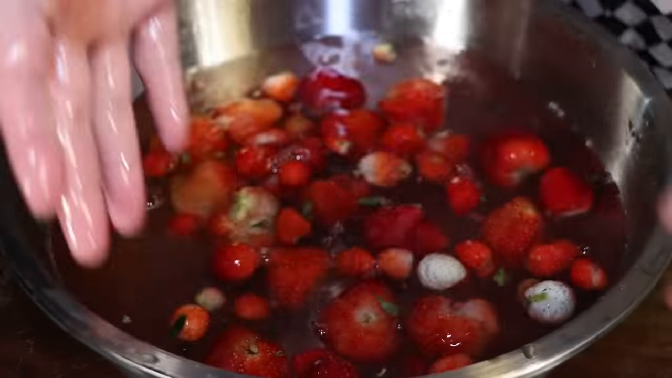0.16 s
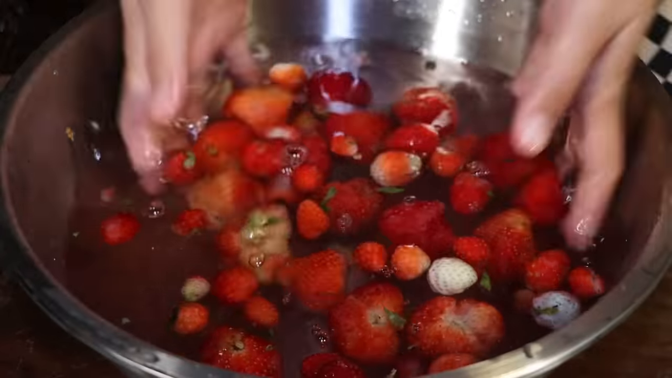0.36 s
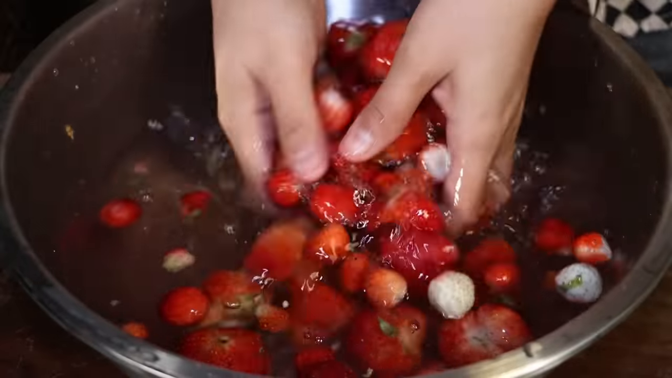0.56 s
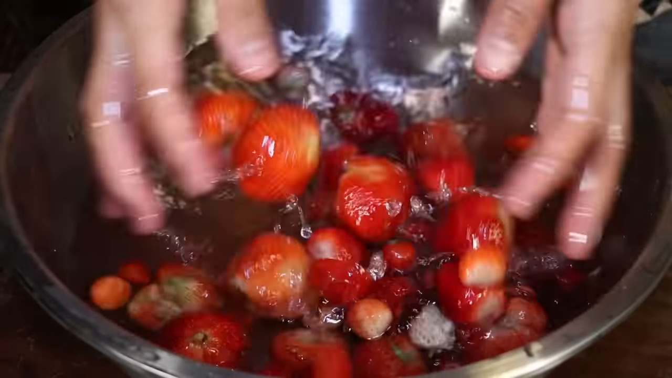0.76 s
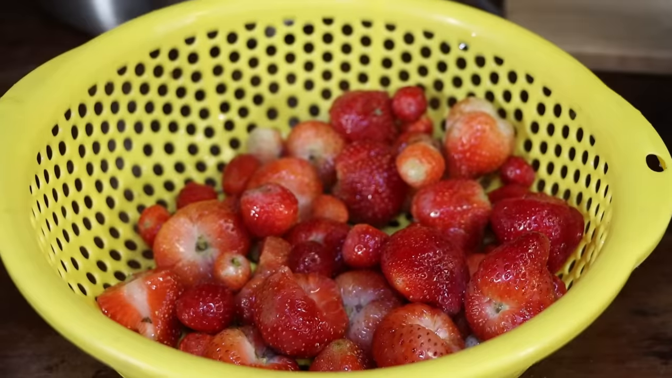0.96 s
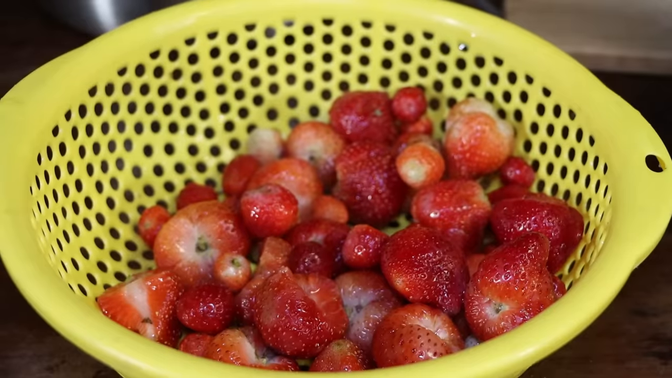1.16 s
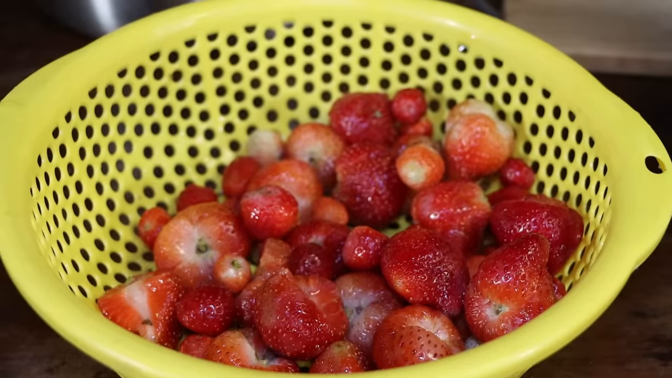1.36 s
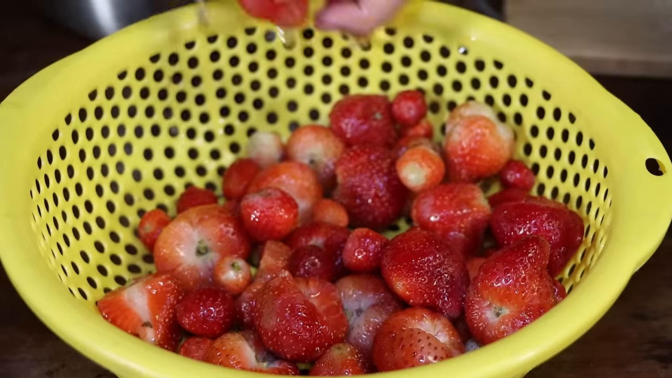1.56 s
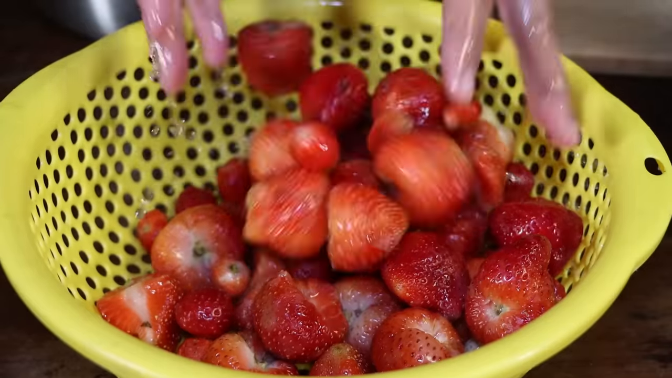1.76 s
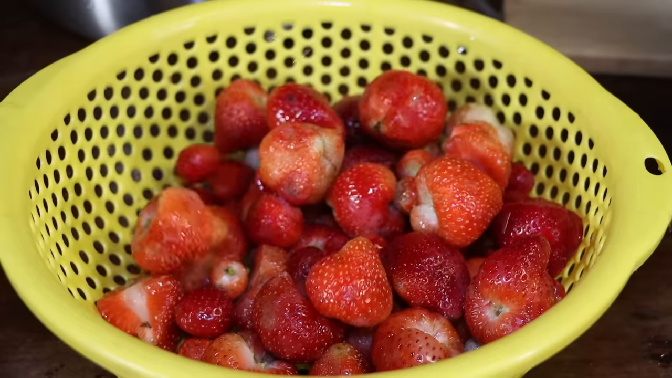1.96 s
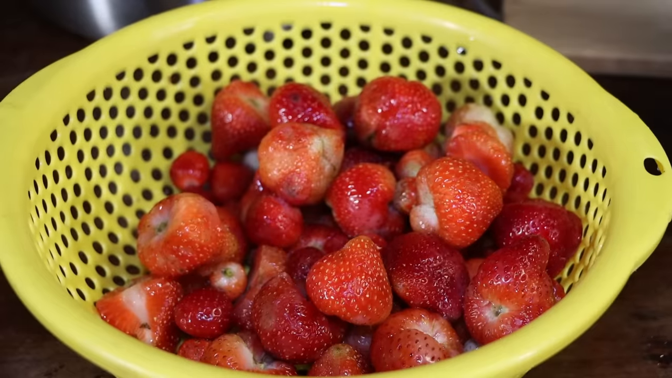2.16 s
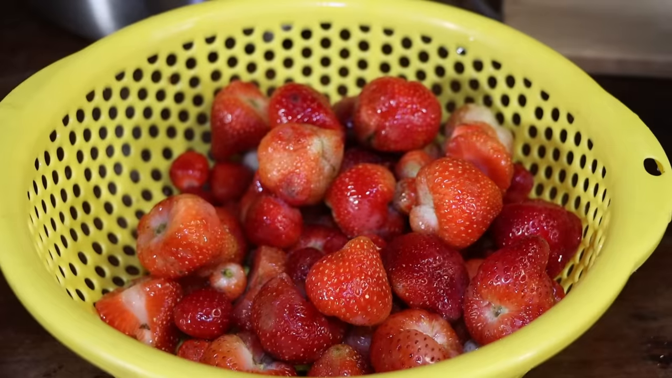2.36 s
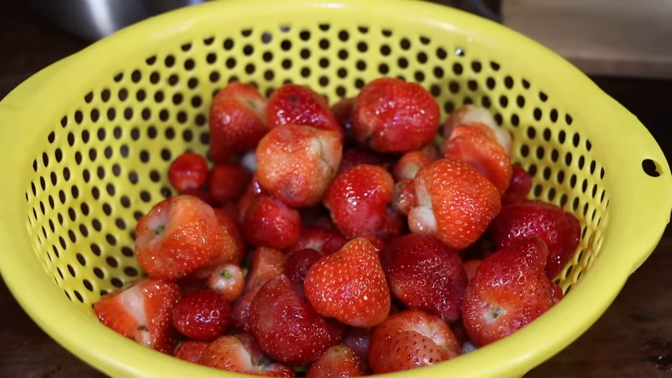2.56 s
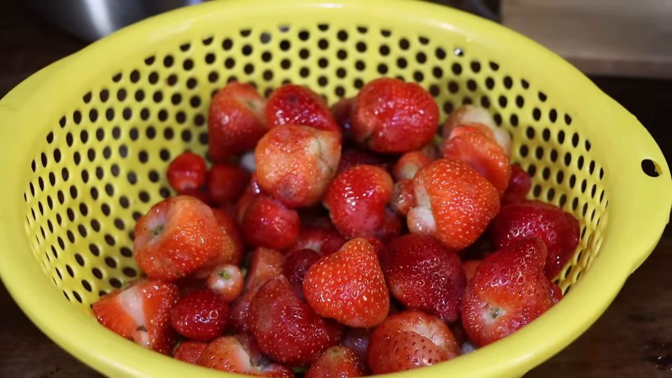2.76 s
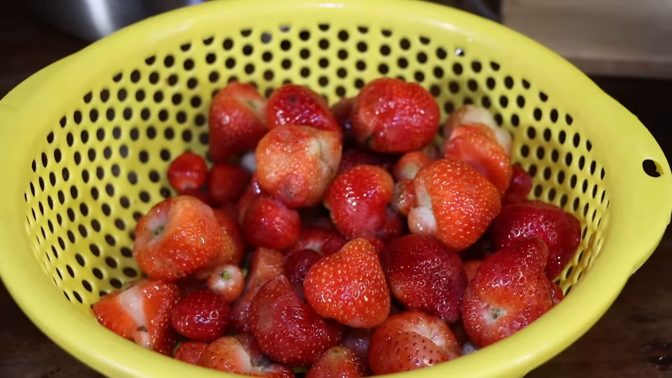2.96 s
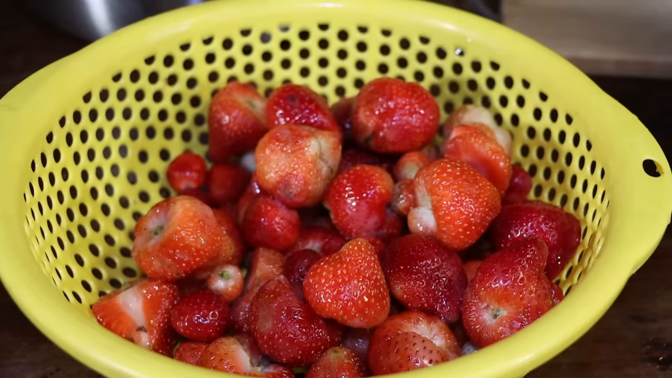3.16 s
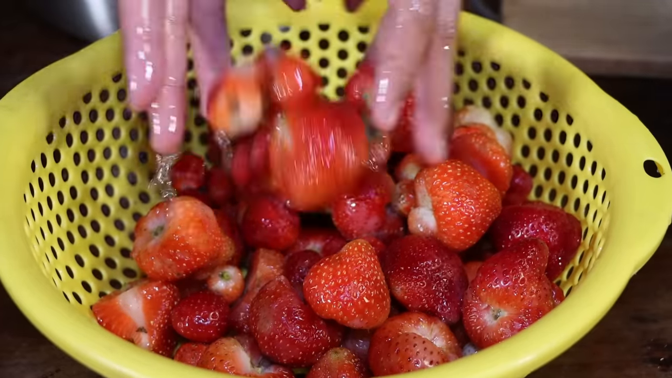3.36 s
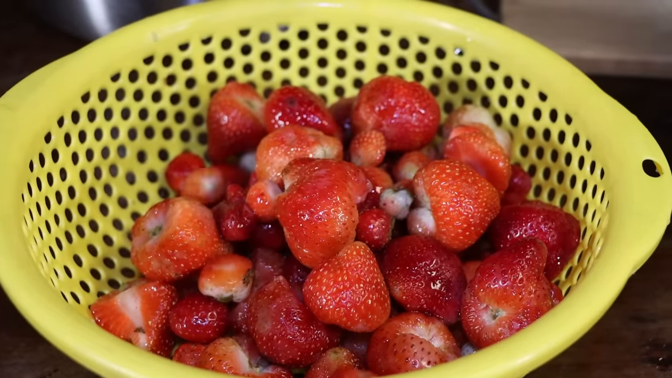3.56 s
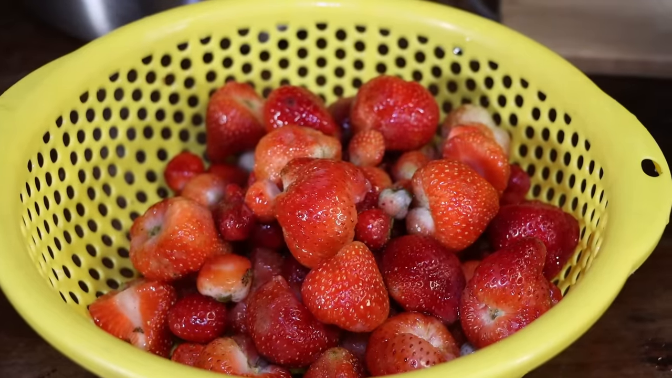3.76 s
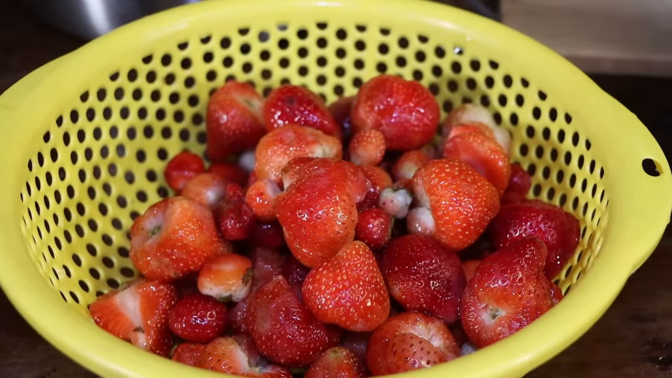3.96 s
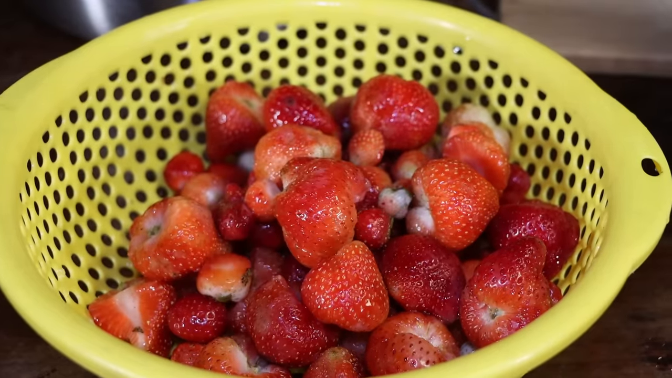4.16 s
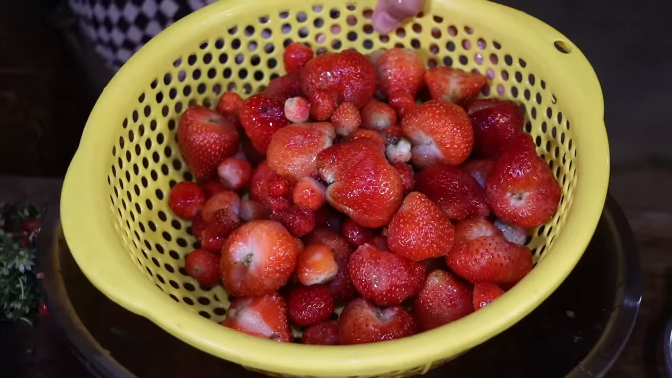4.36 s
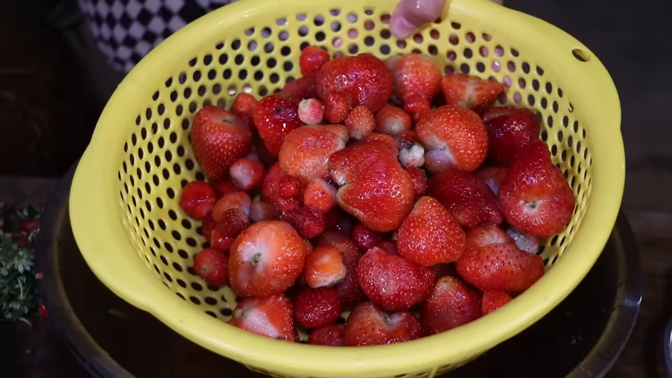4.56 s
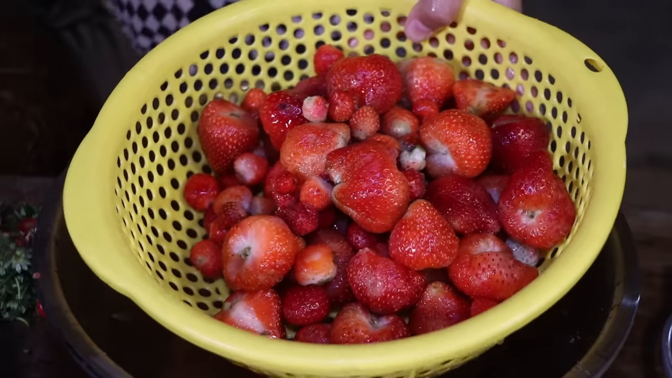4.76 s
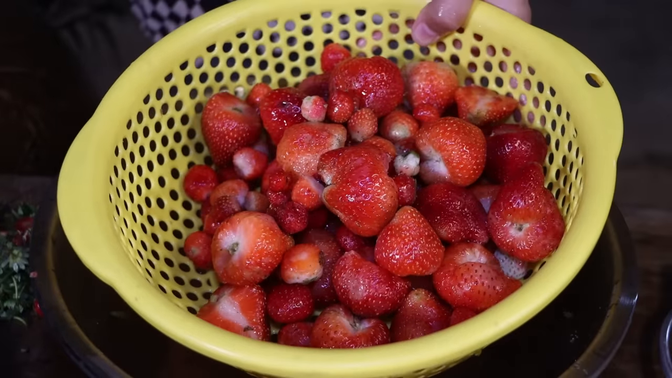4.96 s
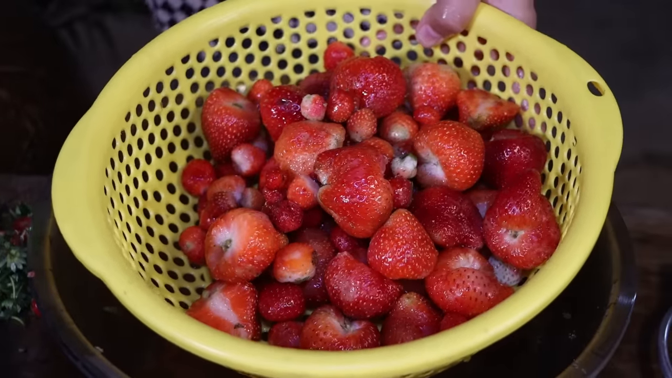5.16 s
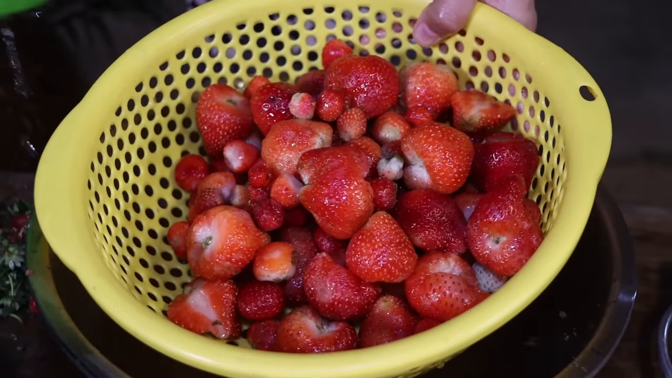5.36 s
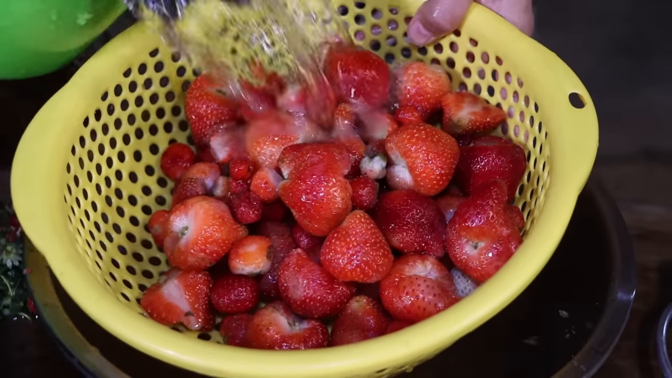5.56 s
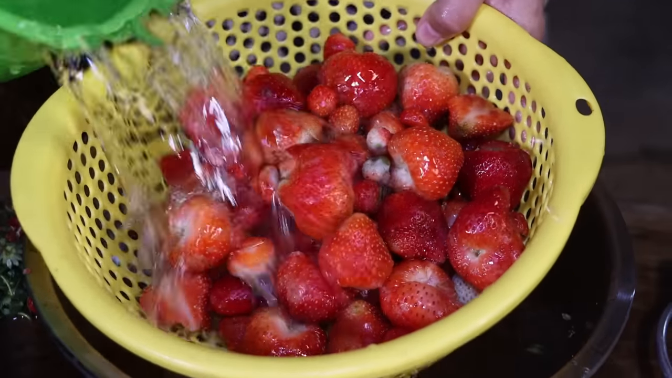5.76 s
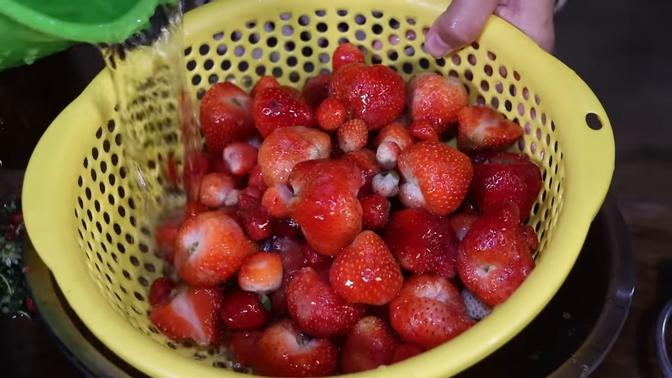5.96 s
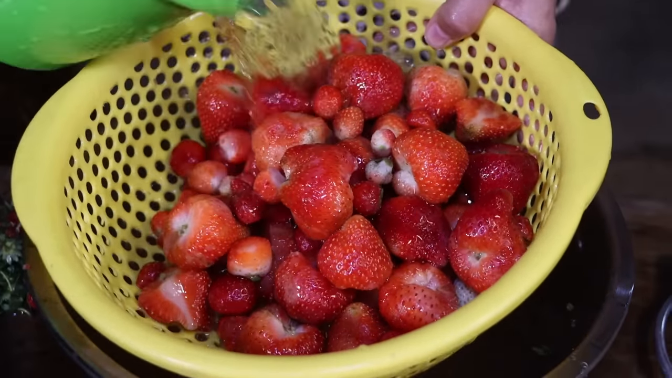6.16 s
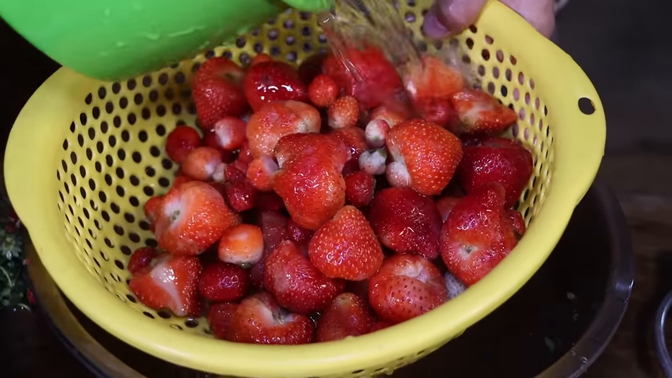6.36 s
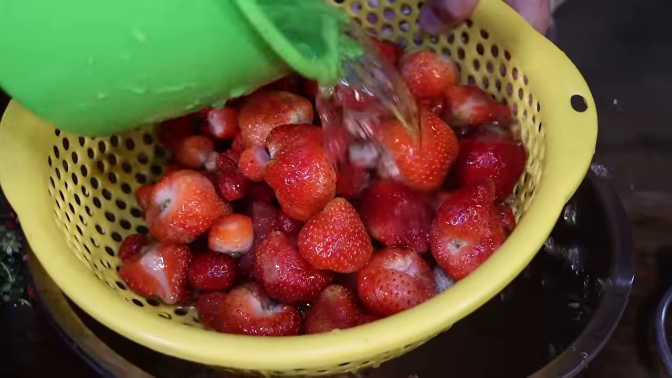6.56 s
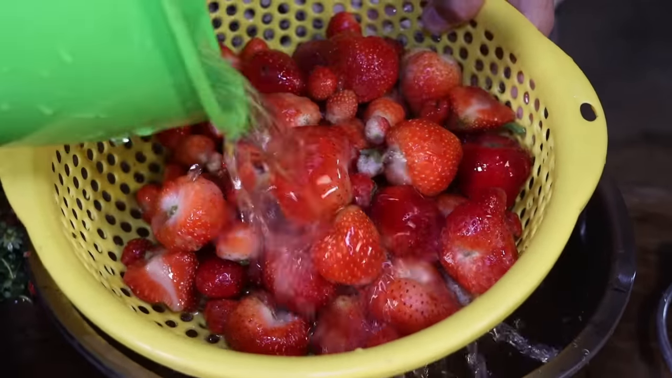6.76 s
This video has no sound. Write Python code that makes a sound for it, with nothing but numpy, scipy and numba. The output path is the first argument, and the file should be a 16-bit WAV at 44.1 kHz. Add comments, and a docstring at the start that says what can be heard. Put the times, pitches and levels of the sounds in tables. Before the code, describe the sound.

Low hollow thumps and splashing open, then sparse drips and soft fruit plops, then gurgling poured water, over throbbing crickets and a faint low hum.

```python
"""Rinsing fruit in a garden

Three passages joined by short silences: hands lift fruit from a steel bowl of water, fruit drops into a plastic
colander beside the bowl, then water is scooped up and poured over it. Bubbles are decaying tones of rising pitch,
spray is puffs of filtered noise, thuds and the bowl are sets of decaying modes. Crickets (a throbbing band-noise
chorus and a near one of tone strokes) chirp over a low noise hum and faint hiss; short echoes surround the vessels.
"""
import sys
import numpy as np
from scipy import signal
from scipy.fft import rfft, irfft
from scipy.io import wavfile
from scipy.ndimage import uniform_filter1d
from numba import njit

SR = 44100
rng = np.random.default_rng(int(sys.argv[2]) if len(sys.argv) > 2 else 0)


def dump_mix(stems):
    """Bounce the given channels to the path in sys.argv[1] as a 16-bit WAV at rate SR."""
    frames = np.atleast_2d(stems).T  # one column per channel
    limited = np.clip(frames, -1, 1)  # hard clip at full scale
    pcm = np.round(limited * 32767).astype(np.int16)
    wavfile.write(sys.argv[1], SR, pcm)


N = 300321
TOP_HZ = 15700


def undb(db):
    """Amplitude factor of a level in dB."""
    return 10 ** (np.asarray(db) / 20)


def level(x, db):
    """Scales x to an rms level in dB."""
    return x * undb(db) / np.sqrt(np.mean(x ** 2))


def split_db(pan_db):
    """Left and right gains in dB from their difference."""
    return np.array([pan_db, -pan_db]) / 2


@njit
def ring(n, rows):
    """Decaying tones; rows of (start [s], pitch [Hz], t60 [s], rise [s], glide [1/s], left, right, right lag [s])."""
    out = np.zeros((2, n))
    for s, hz, t60, rise, glide, left, right, lag in rows:
        a, phase, i = 1., 0., int(s * SR)
        fall, on = np.exp(-np.log(1000) / (t60 * SR)), 0.
        while a > .002 and i < n:
            on += (1 - on) / (1 + rise * SR)
            phase += 2 * np.pi * hz / SR
            hz, a = min(hz * (1 + glide / SR), .45 * SR), a * fall
            out[0, i] += left * a * on * np.sin(phase)
            out[1, i] += right * a * on * np.sin(phase - 2 * np.pi * hz * lag)
            i += 1
    return out


def tones(s, hz, db, t60, rise, glide, pan_db, lag_s=0.):
    """Decaying tones placed between the microphones by level and lag."""
    columns = np.broadcast_arrays(s, hz, t60, rise, glide, undb(db + pan_db / 2), undb(db - pan_db / 2), lag_s)
    return ring(N, np.array(columns, float).T.copy())


def noise(shape, alike):
    """Two-channel noise of rms 1 with a (Hz, dB) colour; alike = left-right correlation."""
    hz, db = np.transpose(shape)
    log_hz = np.log(np.arange(N // 2 + 1) * SR / N + 1)
    gain = undb(np.interp(log_hz, np.log(hz), db, left=-90, right=-90))
    mid, side = irfft(rfft(rng.standard_normal((2, N))) * gain, N)
    c = np.clip(alike, 0, 1)
    return level(np.sqrt(1 + c) * mid + np.sqrt(1 - c) * side * np.array([[1], [-1]]), 0)


def walk(rate_hz):
    """Random values drawn rate_hz times a second, joined by straight slopes; rms near 1.8."""
    k = int(SR / rate_hz)
    return 2.18 * uniform_filter1d(np.repeat(rng.standard_normal(N // k + 1), k), k)[:N]


def burst(white, s, db, hz, sharp, skirt, t60, rise, pan_db):
    """Start sample and sound of a puff of noise round a centre, with a broad skirt."""
    i = int(s * SR)
    x = white[:, i:i + int((t60 + 3 * rise) * SR)]
    t = np.arange(x.shape[1]) / SR
    core = signal.lfilter(*signal.iirpeak(hz, sharp, fs=SR), x)
    shape = (1 - np.exp(-t / rise)) * undb(-60 * t / t60)
    tick = skirt * x * undb(-60 * t / 0.012)  # the broad part is only the first instant
    return i, (core + tick) * shape * undb(db + split_db(pan_db)[:, None])


def lay(bursts):
    """Sums bursts at their start samples."""
    out = np.zeros((2, N))
    for i, sound in bursts:
        out[:, i:i + sound.shape[1]] += sound
    return out


# passages: (start [s], end [s], chorus pause time [s], chorus level [dB], pause depth [dB], hum level [dB])
PASSAGES = [(0, .868, .2, -47.5, 4, -48.5), (.916, 4.276, .96, -49.5, 6.5, -54),
            (4.316, 6.82, 5.47, -49, 13, -50.5)]


def per_passage(column):
    """One value of each passage, held until the next starts."""
    table = np.array(PASSAGES)
    return table[np.searchsorted(table[1:, 0], np.arange(N) / SR), column]


# moving water, reference curves: (time [s], bubbling [dB], spray [dB], left minus right [dB])
WATER_MOTION = [(0.0, -27, -76.5, -13), (0.024, -33.5, -51, -16), (0.134, -42.5, -57, -4),
                (0.212, -57, -67.5, -15), (0.426, -59.5, -60, 0.0), (0.488, -32.5, -39.5, -0.5),
                (0.604, -45.5, -53, -1.5), (0.656, -45, -53, -3.0), (0.718, -39.5, -63, -3.5),
                (0.868, -57, -43.5, -2), (0.92, -47.5, -70, -2.5), (1.2, -56, -55.5, 0),
                (1.32, -60.5, -63, -3), (1.39, -60, -58.5, 0), (1.54, -58.5, -70.5, -3.5),
                (2.16, -60, -63.5, -2), (2.32, -55, -56, -1.5), (2.71, -63, -57.5, 0),
                (2.81, -56, -51.5, -1), (2.94, -55, -54.5, 0.0), (3.08, -61.5, -62.5, -2),
                (3.49, -57, -60.5, -2), (3.74, -61, -71, -5), (4.23, -62.5, -71, -1.5),
                (4.28, -52, -66, 2.5), (4.316, -48, -47, 4), (4.356, -33.5, -56, 4), (4.49, -36, -45, 3),
                (4.526, -36.5, -38, -0.5), (4.604, -33, -63, 11), (4.734, -32.5, -42.5, 0.5),
                (4.784, -45, -54.5, 4), (4.954, -40.5, -42.5, 3), (5.18, -41.5, -49, 5),
                (5.418, -69, -63.5, -4), (5.456, -73, -63, -0.5), (5.5, -63, -55.5, 4),
                (5.626, -74, -67, -2), (5.65, -71, -68, 4), (5.662, -63, -41, -1), (5.69, -47, -37.5, -1),
                (5.702, -44, -38, -1), (5.772, -37.5, -39, 3), (6.0, -33, -36.5, -4),
                (6.02, -30.5, -35, -1), (6.154, -40, -40, -3), (6.246, -37, -39.5, 1),
                (6.544, -31.5, -41, -3.5), (6.81, -31, -42, -2.5)]


def motion(s):
    """Bubbling dB, spray dB and left minus right dB of the water at times s."""
    at, *columns = np.transpose(WATER_MOTION)
    return [np.interp(s, at, c) for c in columns]


def swarm(curve_db, pan_db, count, lo_hz, hi_hz, cycles, scatter_db, clump_db, glide):
    """Many small pockets of air all over the vessel, each ringing some cycles; they come in clumps."""
    s, pitch, pitch2, size, side, long = rng.random((count, 6)).T
    at = (s * (N - 1)).astype(int)
    hz = lo_hz * (hi_hz / lo_hz) ** ((pitch + pitch2) / 2)
    db = -scatter_db * np.log(1 - .97 * size) + clump_db * walk(30)[at]
    t60 = cycles * (0.22 + long) / hz
    place = 2 * side - 1
    cloud = tones(at / SR, hz, db, t60, .12 * t60, glide / t60, 4 * place, 0.000078 * place)
    return level(cloud, 0) * undb(curve_db + split_db(pan_db))


STILL_DB = -53.5  # below this level of bubbling the water is too calm for large bubbles
# rush colour: (frequency [Hz], relative density [dB per Hz])
RUSH_COLOUR = [(290, -14), (500, -24), (640, -1), (761, -49), (880, 1.5), (1820, 2), (2930, -5),
               (3590, 0.5), (12500, -12.5), (16000, -25.5)]


def water():
    """Moving water: swarms of large and small bubbles, a patter and a fizz of fine drops and a rushing noise."""
    bubble_db, spray_db, pan_db = motion(np.arange(N) / SR)
    plop_db = bubble_db - 6.5 + np.minimum(bubble_db - STILL_DB, 0)
    plops = swarm(plop_db, .3 * pan_db, count=900, lo_hz=609, hi_hz=2600,
                  cycles=74, scatter_db=3.0, clump_db=-0.5, glide=0.044)
    gurgle = swarm(bubble_db - 8.0, .23 * pan_db, count=6000, lo_hz=498.5, hi_hz=2714,
                   cycles=36, scatter_db=3.0, clump_db=3.0, glide=0.096)
    patter = swarm((bubble_db + spray_db) / 2 - 1.5, pan_db, count=8000, lo_hz=1467, hi_hz=7800,
                   cycles=41, scatter_db=6, clump_db=1.5, glide=0.29)
    fizz = swarm(spray_db - 1.5, pan_db, count=14000, lo_hz=4070, hi_hz=21100,
                 cycles=6.3, scatter_db=6.0, clump_db=2.0, glide=0.12)
    rush = noise(RUSH_COLOUR, 0.34)
    rush *= undb(spray_db - 0.5 + 2.07 * walk(40) + split_db(pan_db))
    return plops + gurgle + patter + fizz + rush


# hum colour: (frequency [Hz], relative density [dB per Hz])
HUM_COLOUR = [(15, -56), (25, -40), (58, -3), (75, 0.5), (95, -7), (222, -12.5), (386, -19), (593, -18.5),
              (657, -17.5), (893, -54.5), (1820, -54), (3300, -66), (4290, -75.5), (7260, -120)]


def hum():
    """Low noise, nearly alike at both microphones, wavering slowly in level."""
    return noise(HUM_COLOUR, 0.94) * undb(per_passage(column=5) + 1.1 * walk(6))


def hiss():
    """Steady, faint high noise."""
    return noise([(2500, -36.5), (5000, 0.0), (12500, 12.0), (16000, -8.5)], .1) * undb(-64)


CHORUS_PERIOD_S = .223
# chorus bands: (centre [Hz], width [Hz], relative level [dB])
CHORUS_BANDS = [(3990, 305, 5), (4227, 290, 5), (4654, 230, 0.5)]


def cricket_chorus():
    """Far crickets: narrow noise bands that throb in step, blurred by leaves."""
    phase = ((np.arange(N) / SR - per_passage(column=2)) / CHORUS_PERIOD_S + .5) % 1 - .5
    throb_db = per_passage(column=3) - per_passage(column=4) * np.exp(-(phase / 0.18) ** 4)
    white = noise([(3000, 0.0077), (6000, 0)], 0.073)
    chorus = 0
    for hz, width_hz, db in CHORUS_BANDS:
        band = signal.iirpeak(hz, hz / width_hz, fs=SR)
        chorus = chorus + undb(db) * signal.lfilter(*band, signal.lfilter(*band, white))
    return level(chorus, 0) * undb(throb_db + walk(60))


# soft fruit and knuckles on the hollow vessels: (time [s], relative level [dB], pitch [Hz], wet slap [dB])
THUDS = [(.001, -0.5, 177.3, -6.5), (0.023, -4.5, 214, -41), (0.04, 3, 202, -9.5), (.066, 1.5, 185.5, -9.5),
         (.078, 3, 207.6, -7.5), (.104, -5.5, 186, -46), (.134, -9, 181, -26), (0.164, -11.5, 218, -36),
         (.199, -21, 278, -60), (0.243, -17.5, 165, -48), (.428, -25.5, 162.5, -35.5),
         (1.85, -29.5, 117.4, -25.5), (1.863, -28, 149, -29), (1.88, -31, 105.5, -29),
         (1.924, -24, 215, -32), (1.939, -24, 183, -33.5), (2.009, -35.5, 121, -53), (2.136, -29, 233, -45),
         (2.124, -22, 145, -35.5), (2.205, -36, 133, -23), (3.494, -38.5, 170, -35),
         (3.519, -38.5, 109, -30), (3.581, -39, 130, -36), (3.614, -18.5, 166.6, -39),
         (3.728, -30.5, 183, -58)]
# side modes: (pitch ratio, relative level [dB])
THUD_MODES = [(.72, -0.5), (1.45, 8.5), (2.099, 1.5), (2.798, -6)]
THUD_CYCLES = 11.8
OVERTONE_DB, OVERTONE_DB_PER_OCTAVE = 1.5, -10.5  # at 100 Hz; fading as the thud's pitch climbs


def thuds():
    """Hollow bodies: a main mode dying in a set number of cycles, plus side modes that ring shorter the higher
    they sit."""
    s, db, hz, _ = np.transpose(THUDS)
    t60 = THUD_CYCLES / hz
    over_db = OVERTONE_DB + OVERTONE_DB_PER_OCTAVE * np.log2(hz / 100)
    out = tones(s, hz, db + 6.0, t60, 0.0088, 0, -.9)
    for ratio, mode_db in THUD_MODES:
        out += tones(s, ratio * hz, db + over_db + mode_db, t60 / ratio ** 0.35, 0.0097, 0, -0.79)
    return out


def wet_slaps(wide):
    """A broad puff of noise with each thud."""
    return lay([burst(wide, s, slap_db, 1300, 0.79, .15, 0.03, 0.0014, -0.87) for s, _, _, slap_db in THUDS])


def stray_drops(count):
    """Rows of small drops at random moments, their level following the spray 26 ms earlier."""
    s, size, pitch, long = rng.random((count, 4)).T
    s = s * (N / SR - .01)
    db = motion(s)[1] + 9 - 5 * np.log(1 - .95 * size)
    return np.transpose([s + .026, db, 5000 * 2.5 ** pitch ** 2, .013 + 0.016 * long])


# loudest drops bursting into spray: (time [s], relative level [dB], centre [Hz], t60 [s])
DROPS = [(.021, -39, 5380, 0.023), (.002, -21, 5310, 0.016), (.037, -21, 5150, 0.017),
         (.05, -24, 5230, .012), (.064, -23, 5150, 0.013), (.076, -9.5, 4850, 0.017),
         (.092, -35, 5240, .029), (.132, -45, 5480, .03), (.143, -31, 5490, 0.027),
         (.434, -24.5, 5030, 0.2), (.486, -25, 5500, 0.027), (.504, -22, 5600, 0.065),
         (.537, -23, 6000, .033), (.565, -11, 5000, 0.012), (.59, -20, 7700, 0.0084),
         (.676, -29, 12800, 0.028), (.698, -23, 5400, 0.012), (.709, -13.5, 5700, 0.014),
         (.742, -28, 10500, 0.019), (.777, -24, 5600, 0.032), (.857, -21, 11100, 0.068),
         (.923, -33, 6170, .025), (1.031, -24.5, 7960, 0.0089), (1.072, -29, 5800, 0.033),
         (1.494, -23.5, 9400, 0.033), (1.559, -32.5, 6010, 0.038), (1.75, -31, 7720, .028),
         (1.836, -34, 9300, .03), (1.861, -24, 12400, .021), (2.131, -22.5, 10700, .036),
         (2.172, -31, 11900, .017), (2.194, -12, 6700, 0.018), (2.202, -10, 6750, 0.051),
         (2.219, -13.5, 5670, 0.028), (2.39, -26.5, 5670, 0.24), (2.412, -31.5, 6500, 0.13),
         (2.496, -26, 5340, 0.03), (2.55, -26, 5500, 0.051), (2.621, -30.5, 6700, 0.091),
         (2.732, -25, 7800, 0.066), (2.806, -13.5, 4860, 0.062), (2.828, -16.5, 6170, 0.035),
         (2.882, -23, 5350, 0.014), (2.929, -27, 6090, .022), (2.957, -21, 4800, 0.04),
         (3.043, -26.5, 6530, 0.026), (3.093, -31.5, 8050, .03), (3.256, -15.5, 5500, 0.13),
         (3.386, -35.5, 9500, .024), (4.511, -25.5, 7800, 0.021), (4.684, -25.5, 12300, 0.086),
         (4.737, -29.5, 11000, 0.18), (5.495, -19.5, 8400, 0.015), (5.664, -12.5, 11400, 0.048),
         (5.699, -17.5, 10500, 0.068), (5.72, -22, 5730, .019), (5.806, -25, 5500, .032),
         (5.846, -15.5, 5770, 0.018), (6.56, -23, 4000, .015), (6.575, -24, 4200, .015),
         (6.06, -23, 6200, .027), (6.203, -15, 5770, .022), (6.338, -20.5, 7100, .034),
         (6.443, -21, 5560, 0.051)]
SPLAT_RISE_S = 0.0011
SKIRT_DB, SKIRT_DB_PER_S = 4.5, -250  # a longer burst has less broad crack


def splats(fine):
    """Drops bursting into spray: short puffs of peaked noise with a broad crack at the onset."""
    bursts = []
    for s, db, hz, t60 in np.vstack([DROPS, stray_drops(count=160)]):
        skirt = undb(SKIRT_DB + SKIRT_DB_PER_S * t60)
        bursts.append(burst(fine, s - SPLAT_RISE_S, db, hz, 9.5, skirt, t60, SPLAT_RISE_S, motion(s)[2]))
    return lay(bursts)


# loudest single bubbles: (time [s], relative level [dB], pitch [Hz], t60 [s])
BUBBLES = [(0.312, -35, 1060, 0.024), (.354, -32, 1020, 0.021), (.43, -23, 620, .03),
           (.457, -23, 2290, 0.023), (0.507, -20.5, 3110, 0.023), (0.527, -17, 1710, 0.027),
           (.552, -0.5, 1333, .025), (.567, -27, 1280, 0.017), (0.592, -18.5, 1170, 0.045),
           (0.638, -14.5, 1120, 0.016), (.665, -19.5, 926, 0.038), (.713, -4, 1680, 0.0088),
           (0.749, -28, 1430, 0.047), (0.776, -24.5, 3440, 0.017), (0.699, -31, 1120, .04),
           (.792, -24, 1480, .043), (.845, -27.5, 1580, .026), (.821, -23, 1830, 0.015),
           (.858, -12.5, 1910, 0.0073), (0.918, -21, 2600, 0.0093), (1.006, -33, 2600, 0.02),
           (1.031, -28.5, 1080, 0.022), (1.055, -32, 1180, 0.026), (1.193, -39, 1470, 0.033),
           (1.318, -39.5, 2180, .03), (1.422, -47, 2480, .03), (1.077, -18, 1260, 0.025),
           (1.217, -32, 3300, 0.015), (1.249, -43, 1520, 0.063), (1.39, -33.5, 3080, 0.018),
           (1.738, -34, 2930, 0.015), (1.835, -36.5, 2160, 0.024), (1.919, -33, 1460, 0.013),
           (2.315, -25.5, 2300, .025), (2.788, -31.5, 2340, 0.047), (2.805, -20.5, 2010, 0.035),
           (2.814, -10, 2310, 0.011), (2.822, -19, 1150, 0.017), (2.841, -15.5, 1460, 0.025),
           (2.859, -26, 2100, 0.022), (2.888, -24, 1540, 0.023), (2.954, -34.5, 1520, 0.077),
           (2.974, -24, 3400, 0.0097), (3.022, -32, 1880, 0.023), (2.999, -35, 3370, 0.028),
           (3.05, -38.5, 1620, 0.032), (3.074, -41, 1700, .03), (3.102, -43, 2290, 0.045),
           (4.342, -30, 1150, 0.18), (4.367, -27.5, 1195, 0.11), (4.395, -33, 2240, 0.059),
           (4.435, -29, 1113, 0.13), (4.502, -22.5, 1106, 0.046), (4.521, -18.5, 1044, 0.079),
           (4.544, -21, 1080, 0.051), (4.541, -15.5, 648, 0.065), (4.623, -31, 1920, 0.017),
           (4.715, -15, 1590, 0.019), (5.2, -38, 1100, .04), (4.657, -18.5, 463, 0.031),
           (4.693, -25, 1813, 0.052), (4.714, -18.5, 1200, 0.086), (4.87, -22, 660, 0.028),
           (4.933, -30, 1770, 0.026), (4.959, -10.5, 634, 0.011), (5.126, -28, 2020, 0.056),
           (5.17, -27, 1350, 0.036), (5.239, -34, 1093, 0.065), (5.502, -24, 2500, 0.0092),
           (5.689, -11, 2220, 0.025), (5.727, -24.5, 3600, 0.049), (5.754, -18.5, 4100, 0.013),
           (5.807, -16, 2200, 0.012), (5.855, -22, 2580, 0.03), (6.014, -10.5, 1850, 0.025),
           (6.03, -13, 1170, 0.048), (6.06, -8.5, 1440, 0.022), (5.773, -27, 1165, 0.033),
           (5.902, -24, 1030, 0.034), (5.94, -23.5, 1594, 0.03), (6.032, -18, 1713, 0.074),
           (6.076, -18, 884, 0.045), (6.281, -29, 890, .029), (6.521, -22, 1445, 0.077),
           (6.746, -25, 870, 0.053), (2.409, -44, 1950, 0.11), (5.041, -29, 1140, 0.04),
           (6.113, -38, 950, 0.039), (6.231, -6, 1200, 0.0091), (6.351, -10.5, 1720, 0.01),
           (6.383, -16.5, 874, .048), (6.411, -15.5, 1150, 0.036), (6.487, -15, 615, 0.028),
           (6.532, -12.5, 1058, 0.031), (6.576, -13.5, 870, .031), (6.645, -20.5, 1030, 0.038)]
BUBBLE_RISE_CYCLES = 3.2


def bubbles():
    """Each bubble rises a little in pitch as it nears the surface; a shorter one follows within 6 ms."""
    s, db, hz, t60 = np.transpose(BUBBLES)
    late, ratio, place = rng.random((len(s), 3)).T
    lag_s = .00008 * (2 * place - 1)
    rise, pan_db = BUBBLE_RISE_CYCLES / hz, 0.51 * motion(s)[2]
    first = tones(s, hz, db, t60, rise, 3.1, pan_db, lag_s)
    second = tones(s + .006 * late, hz * (.8 + .5 * ratio), db + 2.5, 0.45 * t60, rise, 4.2, pan_db, lag_s)
    return first + second


def bubble_spits(wide):
    """A puff of noise above the bubble's pitch as each bubble opens."""
    return lay([burst(wide, s - .001, db, 1.32 * hz, 3.7, 0.04, 1.1 * t60, 0.00022, motion(s)[2])
                for s, db, hz, t60 in BUBBLES])


# steel bowl modes: (pitch [Hz], t60 [s])
BOWL_MODES = [(158, 0.94), (377, 0.64), (497, 1), (586, 0.5), (646, 0.42), (824, 0.53), (1100, 0.34),
              (1410, 0.44), (1488, .97), (1600, .5), (1825, 0.24), (1960, 0.17)]
# touches that set the bowl ringing: (time [s], relative level [dB], favoured pitch [Hz])
TOUCHES = [(0.429, -32, 158), (0.931, -51, 1960), (2.169, -53, 1488), (2.201, -39, 1960),
           (2.408, -40, 1960), (2.41, -53, 1488), (.45, -38, 158), (4.37, -42.5, 824), (4.54, -39.5, 377),
           (4.655, -50, 497), (4.67, -37, 586), (4.88, -37, 646), (4.957, -35, 377), (4.98, -45, 1406),
           (5.0, -42, 1620), (5.02, -42, 1960), (5.025, -46, 1100), (5.19, -44.5, 1825), (5.23, -46.5, 824),
           (5.23, -49, 586), (6.049, -38.5, 1488), (6.49, -45, 586), (6.55, -37, 1488)]
TOUCH_DB_PER_OCTAVE = -150
PAIR_RATIO, PAIR_DB = 1.006, -13  # each mode of a round bowl is a close pair


def bowl():
    """Steel bowl: each touch rings the modes near its favoured pitch, in close pairs."""
    rows = []
    for hz, t60 in BOWL_MODES:
        for s, db, near_hz in TOUCHES:
            if .7 < hz / near_hz < 1.4:
                rows.append((s, db + TOUCH_DB_PER_OCTAVE * abs(np.log2(hz / near_hz)), hz, t60))
    s, db, hz, t60 = np.transpose(rows)
    main = tones(s, hz, db, t60, 0.0086, .05, -1.6)
    twin = tones(s, PAIR_RATIO * hz, db + PAIR_DB, t60, 0.022, 0, -1.3)
    # sloshing water loads the bowl unevenly, so the tone wavers
    return (main + twin) * undb(2.8 * walk(25))


# near cricket's chirps: (start [s], length [s], relative level [dB])
CHIRPS = [(2.879, .085, -38), (3.026, .085, -37), (3.169, .085, -37), (3.329, .11, -39), (3.481, .085, -37),
          (3.605, .135, -40), (3.758, .06, -47)]
NEAR_HZ, STROKE_S, FIRST_STROKE_DB = 4896, .0243, -1.5


def near_cricket():
    """Wing strokes at a steady spacing, each three tones scattered round one pitch."""
    s, db = np.transpose([(s + t, db + FIRST_STROKE_DB * (t == 0))
                          for s, long, db in CHIRPS for t in np.arange(0, long, STROKE_S)])
    wing_hz = NEAR_HZ * (1 + .018 * rng.standard_normal((len(s), 3)).T)
    return sum(tones(s, hz, db + 3.0, 0.041, 0.0047, -.1, 1.8) for hz in wing_hz)


def echo(near):
    """Vessel walls and table answer within a few tens of ms, differently at each microphone."""
    t = np.arange(int(.12 * SR)) / SR
    echoes = rng.standard_normal((2, len(t))) * undb(-60 * t / 0.17) * (t > .002)
    echoes = undb(-4) * echoes / np.sqrt(np.sum(echoes ** 2, axis=1, keepdims=True))
    band = signal.butter(2, [1300, 9000], "band", fs=SR, output="sos")
    bright = signal.sosfilt(band, near.mean(axis=0))
    return signal.fftconvolve(bright[None], echoes, axes=1)[:, :N]


def scene():
    """Water, vessels and crickets with their echoes, over hum and hiss."""
    near = water() + bubbles()
    fine = noise([(2500, -14), (5000, 0), (TOP_HZ, 0)], 0.06)
    wide = noise([(500, 0), (TOP_HZ, 0)], 0.54)
    near += splats(fine) + bubble_spits(wide) + wet_slaps(wide)
    near += thuds() + bowl() + cricket_chorus() + near_cricket()
    return near + echo(near) + hiss() + hum()


# left minus right microphone: (frequency [Hz], level difference [dB])
LEFT_TILT = [(200, -.5), (2000, -1), (5000, 0), (12000, 4)]


def record(dry):
    """Tilts the microphones apart, cuts deep bass and top, and leaves silence between the passages."""
    hz, db = np.transpose(LEFT_TILT)
    tilt_db = np.interp(np.log(np.arange(N // 2 + 1) * SR / N + 1), np.log(hz), db)
    x = irfft(rfft(dry) * undb(split_db(tilt_db)), N)
    x = signal.sosfilt(signal.butter(3, 48, "high", fs=SR, output="sos"), x)
    x = np.tanh(x * (1 + x ** 2 / 3))  # straight for all but the loudest peaks, which are rounded off
    t = np.arange(N) / SR
    on = (t >= per_passage(column=0)) * (t < per_passage(column=1))
    return signal.sosfilt(signal.ellip(10, .2, 80, TOP_HZ, fs=SR, output="sos"), x * on)


dry = scene()
out = record(dry)
dump_mix(out)
```